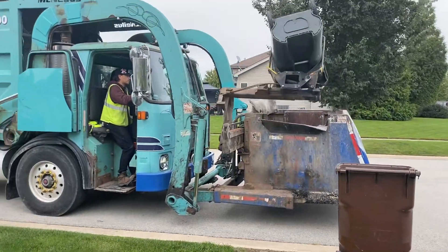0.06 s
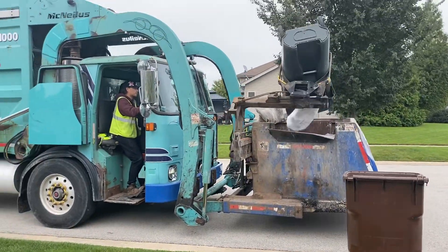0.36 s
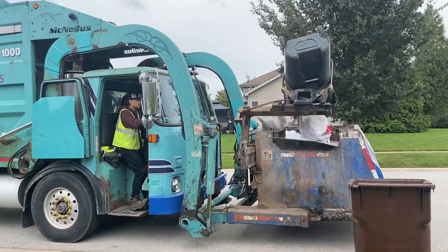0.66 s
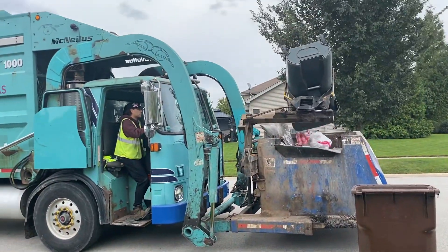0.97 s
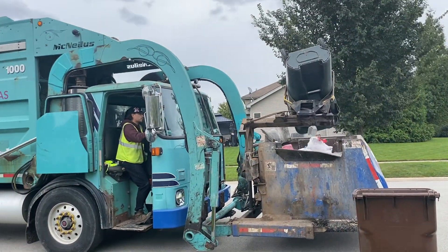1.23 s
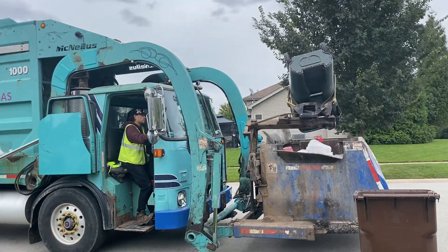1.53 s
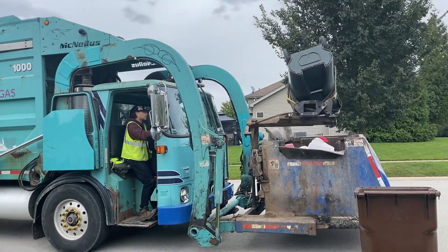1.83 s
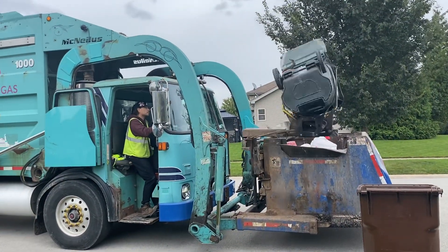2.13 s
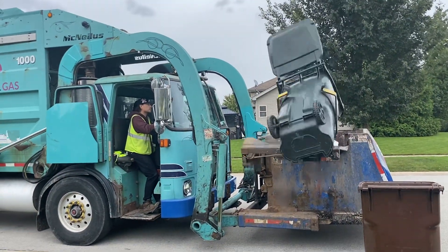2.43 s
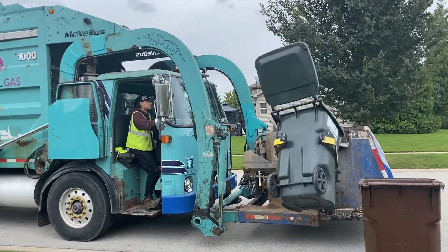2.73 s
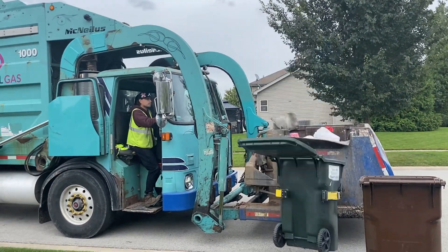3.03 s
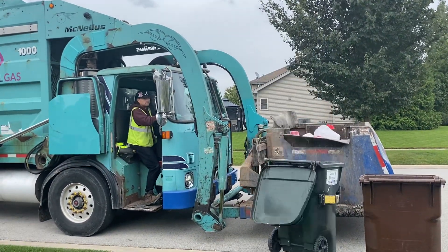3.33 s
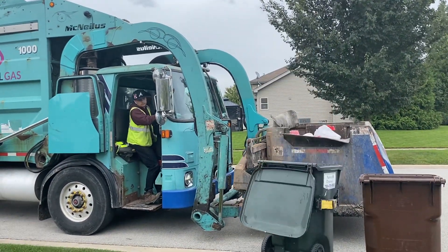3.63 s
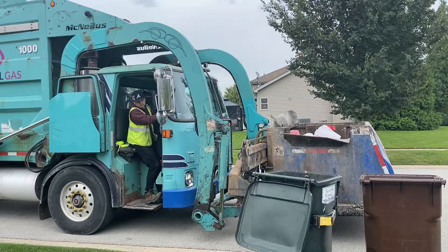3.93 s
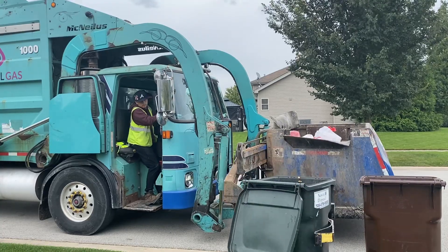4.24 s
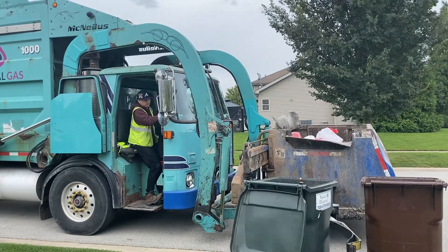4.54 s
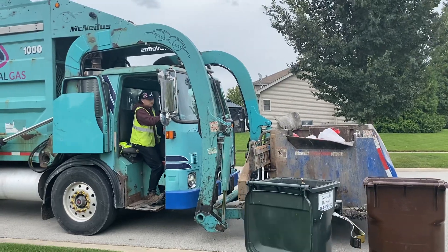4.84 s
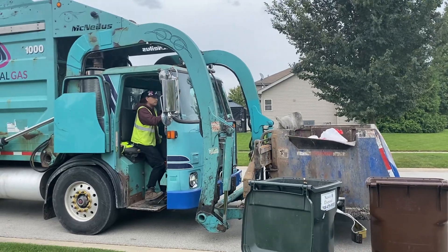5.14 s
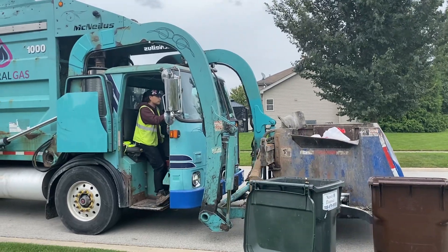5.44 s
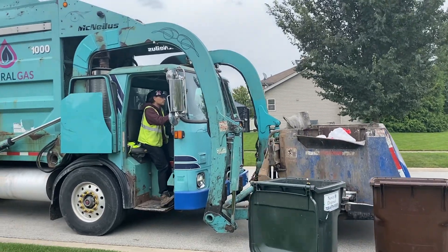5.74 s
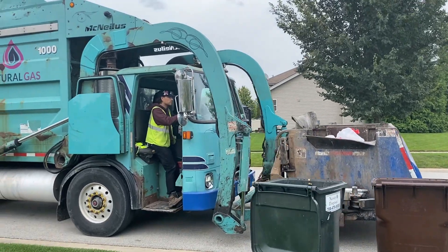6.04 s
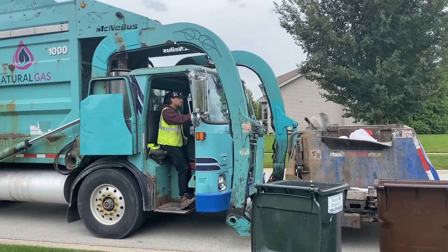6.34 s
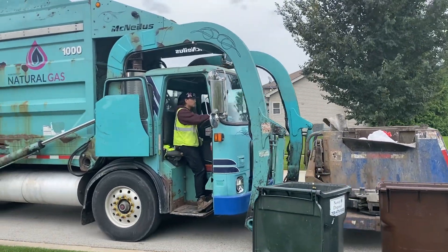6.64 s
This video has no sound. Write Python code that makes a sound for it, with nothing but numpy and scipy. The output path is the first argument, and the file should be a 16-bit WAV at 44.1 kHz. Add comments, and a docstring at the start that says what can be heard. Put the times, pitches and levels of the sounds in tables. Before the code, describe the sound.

A garbage truck idles a few metres away on an open street, with a low exhaust drone, faint pump whine and soft, rapid compressor chuffing. In the first two seconds its hydraulic arm shakes a plastic cart: a thump at 0.2 seconds, a brief rustle of bags at 0.6, and sharp steel clanks with hollow knocks at 0.8 and 1.6. Oil hisses softly as the arm moves. After a lull, the cart comes down from 2.9 to 3.4 seconds, knocking and rattling over booming hopper panels. Lighter taps lead to a heavier flurry of bangs, clanks and hollow drumming from 4 to 4.3, then another knock at 4.8. An air valve gives a short hiss at 5 seconds. Around 6 seconds the engine revs, with clanks, a thump and a very brief pivot squeal. Engine clatter and hydraulic hiss grow louder until the end, near 6.8 seconds.

```python
"""Open street, a few metres from an idling garbage truck. Its hydraulic arm shakes a plastic cart over the
hopper and swings it down: steel joints clank, the hollow cart drums and rattles, hopper panels boom,
bags rustle. An air valve vents; then the engine revs and a dry pivot squeals. Underneath, the exhaust
drones, the pump whines, oil hisses in the valves and the compressor chuffs once per crank turn."""
import sys
import numpy as np
from scipy import signal
from scipy.fft import rfft, irfft, next_fast_len
from scipy.io import wavfile
from scipy.ndimage import uniform_filter1d, minimum_filter1d, map_coordinates

SR = 44100
rng = np.random.default_rng(int(sys.argv[2]) if len(sys.argv) > 2 else 0)


def master_out(mix):
    """Clip the mix to full scale and print it as 16-bit PCM to the path in sys.argv[1]."""
    frames = np.transpose(np.atleast_2d(mix))
    ceiling = np.clip(frames, -1, 1)
    pcm = np.round(ceiling * 32767).astype(np.int16)
    wavfile.write(sys.argv[1], SR, pcm)


N = 299439

# steel on steel in arm and gripper: start_s, level_db, hardness_db, decay_scale_s, contact_hz, ring_share
ARM_CLANKS = [(0.177, -22, -5, 0.075, 1350, 0.2), (.212, -27, -6.5, 0.12, 2700, 0.4),
              (0.753, -31.5, -5, 0.037, 3340, 0.4), (.778, -9, -3, 0.049, 2940, 0.69),
              (1.199, -30, -6.5, 0.15, 1190, 0.17), (1.272, -31.5, -7, 0.059, 2880, 0.43),
              (1.6, -14, 3, 0.045, 1340, 0.6), (1.634, -18, -4, 0.081, 670, 0.03),
              (1.649, -22.5, -3, 0.036, 1900, 0.45), (2.943, -25, -13, 0.058, 1240, 0.26),
              (2.954, -20.5, -7.5, 0.037, 1690, 0.01), (2.99, -30.5, -22, 0.74, 1180, 0.23),
              (3.161, -20, -6, 0.06, 2460, 0.06), (3.976, -20, 6.5, 0.023, 1380, 0.3),
              (4.027, -20, 2, 0.03, 1070, 0.2), (4.046, -23, 3, 0.027, 3760, 0),
              (4.112, -13.5, 2.5, 0.057, 3350, 0.1), (4.163, -20.5, -5, 0.21, 2620, 0.22),
              (4.774, -15.5, -6, 0.0072, 1090, 0), (5.881, -28, -20, 0.01, 1060, 0),
              (6.011, -17.5, -4.5, 0.054, 1300, 0.09), (6.162, -16, -1, 0.081, 970, 0.08),
              (6.191, -25, 2.5, 0.12, 2240, 0.17)]
# steel arm: mode_hz, level_db, t60_s
ARM_MODES = [(233.5, -9, 0.42), (328, -6.5, 0.4), (409, -3.5, 0.41), (655, -12, 0.42), (685, 1.5, 0.093),
             (974, -9, 0.097), (1115, -2, 0.055), (1840, -12, 0.09), (2320, -2.5, 0.092), (2670, -3, 0.037),
             (2966, 1.5, 0.033), (3353, 1, 0.035)]
# linkage resonances: centre_hz, width_hz, gain
LINKAGE_PEAKS = [(2300, 10, 0.26), (3156, 77, 0.35), (4160, 59, 1), (6390, 110, 0.92), (7550, 140, 0.99),
                 (8000, 270, 1)]
# cart's weight jolts the truck: start_s, hopper_thump_db, cart_knock_db
LOAD_JOLTS = [(.18, -11.5, -24), (0.591, -32, -21.5), (.78, -22, -20.5), (1.203, -25, -25),
              (1.603, -20, -14.5), (2.02, -25, -28.5), (2.907, -12.5, -28.5), (2.992, -7.5, -19.5),
              (3.122, -8.5, -20), (3.166, -9, -23), (3.229, -13, -18), (3.32, -20, -23), (3.945, -6.5, -25),
              (3.98, -9, -13), (4.04, -9, -22.5), (4.105, -4.5, -13.5), (4.184, -5.5, -20),
              (4.494, -19, -22.5), (4.774, -13, -21), (6.16, -8, -23.5), (6.217, -8, -30)]
# lowest hopper modes: mode_hz, level_db, t60_s
HOPPER_MODES = [(59.7, -3.5, 0.27), (90, -1.5, 0.3), (125, -5, 0.089), (182.4, -6, 0.31)]
# cart walls and cavity: mode_hz, level_db, t60_s
CART_MODES = [(232, -14, 0.18), (310.5, -14, 0.22), (391, -9.5, 0.52), (441, -8.5, 0.19)]
# blows on cart walls and lid: start_s, note_db, pitch_hz, crack_db
CART_SLAPS = [(.595, -14, 385, -16.5), (.783, -9.5, 390, -28), (1.605, -11.5, 189.5, -22),
              (1.655, -11.5, 400, -34), (3.014, -16, 438, -34), (3.03, -11, 248.5, -39),
              (3.125, -8.5, 880, -22), (3.135, -16, 400, -21), (3.173, -11, 318, -35),
              (3.229, -14, 323, -17), (3.266, -22, 460, -19.5), (3.312, -12, 261, -29),
              (3.512, -21.5, 190.6, -39), (3.592, -21, 820, -31), (3.642, -19, 228.5, -45),
              (3.832, -15, 175.4, -32), (3.984, -2, 348.5, -26), (4.04, -11, 330, -30),
              (4.098, -20, 437, -21), (4.12, -6, 335, -28), (4.151, -13, 296, -21), (4.177, -7.5, 449, -24),
              (4.231, -9, 304, -27), (4.781, -12, 424, -17.5), (6.315, -18, 183, -47)]
# modes of one wall: pitch_ratio, level_db
WALL_MODES = [(0.999, -0.5), (1.271, -6.5), (2.18, -15), (2.74, -13)]
# hopper panels: freq_hz, density_db
BOOM_SPECTRUM = [(20, -28), (42, -39), (58, -3), (100, 4.5), (135, -4), (220, -13), (600, -66)]
# hollow plastic: freq_hz, density_db
RATTLE_SPECTRUM = [(76, -32), (130, -11), (291, 0), (522, -19), (796, -8.5), (1320, -17), (2720, -25),
                   (5290, -37.5), (7150, -32), (8920, -50), (16000, -56)]
# spells of cart chatter: start_s, end_s, level_db, pitch_hz
DRUM_SPELLS = [(3.18, 3.357, -21, 270), (4.08, 4.235, -11.5, 103), (4.777, 4.813, -12.5, 126),
               (4.785, 4.852, -23, 408), (6.161, 6.184, -10, 207)]
# drumming walls: pitch_ratio, density_db
DRUM_SPECTRUM = [(.35, -46), (.75, 6.5), (1.25, 0), (2.1, -12), (4.5, -25.5), (12, -64)]
# pivot slip: time_s, pitch_hz, lowest_mode_db, upper_modes_db
PIVOT_SLIP = [(6.125, 1010, -42, -50), (6.131, 990, -16, -36), (6.139, 980, -10.5, -26),
              (6.148, 965, -21, -18), (6.157, 960, -17, -22), (6.172, 945, -17, -28), (6.19, 935, -36, -50)]
# upper pivot modes: pitch_ratio, level_db
PIVOT_MODES = [(1.95, -9), (2.27, -5), (2.95, 0), (4, -7), (4.9, -10), (6.85, -6)]
# air jet: freq_hz, density_db
NOZZLE_SPECTRUM = [(1060, -35), (1800, -9), (4250, -6), (5100, -10), (6960, -11.5), (8360, -7.5),
                   (9160, -28), (9680, -12), (11900, -17), (13300, -14), (16000, -16)]
# air valve ports: centre_hz, width_hz, gain
PORT_PEAKS = [(4300, 170, 0.6), (6070, 300, 1.4), (7000, 180, 0.87)]
# arm strokes: open_s, close_s, oil_hiss_db, load_sway_db
ARM_STROKES = [(0.196, 0.417, -50.5, -22), (0.526, 0.647, -36, -26), (0.794, 0.994, -43, -25.5),
               (1.28, 2.067, -60, -26.5), (2.887, 2.95, -35.5, -23.5), (3.27, 4.46, -56, -21),
               (4.367, 5.238, -45, -22), (5.39, 5.957, -47, -25), (5.896, 6.8, -37.5, -25)]
# oil and friction hiss: freq_hz, density_db
HISS_SPECTRUM = [(400, -23), (1500, 3), (3000, 10.5), (5000, 1.5), (7000, 6.5), (10000, -0.5), (16000, 2)]
# gear pump whine: crank_order, level_db
PUMP_ORDERS = [(20, -50), (30, -50), (40, -56), (125.3, -57)]
# crankshaft: time_s, speed_hz
CRANK_SPEED = [(0, 13.4), (.3, 13.3), (.5, 12.75), (1, 13), (2.2, 13.4), (3, 13.45), (4.1, 13.55),
               (4.55, 12.9), (5.3, 13.4), (5.95, 13.55), (6.2, 20), (6.37, 18.7), (6.79, 22.6)]
# engine effort: time_s, clatter_db, exhaust_db
ENGINE_EFFORT = [(0, 4, 0.7), (2.6, 2, -1), (5.85, 2.5, -1.5), (6.1, 7, -5), (6.22, 2, 9.5),
                 (6.38, 7.5, -2), (6.55, 14, 3), (6.79, 12, 6)]
# exhaust note: crank_order, level_db
EXHAUST_ORDERS = [(3, -22.5), (4, -36), (5, -34), (6, -24), (10, -38), (13, -41), (16, -43)]
# exhaust pipe: freq_hz, gain_db
PIPE_RESPONSE = [(25, -30), (40, -12), (58, 1), (80, 0), (125, -13), (190, 0)]
# engine block and fan: freq_hz, density_db
BLOCK_SPECTRUM = [(20, -24), (45, 12.5), (100, 7), (170, -5), (380, -5.5), (480, -15), (720, -10.5),
                  (1400, -19.5), (2500, -24), (4500, -30), (7300, -30.5), (10000, -37), (16000, -42)]
# compressor puff: freq_hz, density_db
CHUFF_SPECTRUM = [(300, 4.5), (1400, -6.5), (1720, -8), (2000, -7.5), (2300, -3.5), (3300, -10),
                  (4500, -19), (16000, -34.5)]
# bags and paper: freq_hz, density_db
RUSTLE_SPECTRUM = [(700, -20), (2500, 0), (7000, -2), (12000, -16)]
# street reverberation: freq_hz, t60_s
STREET_DECAY = [(60, 0.22), (400, 0.92), (2000, 0.036), (12000, 0.17)]
# left-right likeness at the microphone pair: freq_hz, correlation
STEREO_CORRELATION = [(100, .99), (330, .95), (600, .76), (3500, .82), (5400, .6), (6600, .92), (7400, .92),
                      (8500, -.96), (9450, -.99), (10600, .92), (11600, .92), (12600, -.98), (13600, -.98),
                      (14700, .95)]
# stereo balance: freq_hz, left_over_right_db
STEREO_BALANCE = [(200, 0), (550, -1.8), (1000, .5), (2000, 2.2), (5000, 2.2), (6700, 0)]


def clanks():
    """Square blows ring the steel arm, glancing ones rattle; harder contacts tick and crack more."""
    track, t = np.zeros((2, N)), np.arange(SR // 2) / SR
    for start_s, level_db, hardness_db, decay_s, contact_hz, ring_share in ARM_CLANKS:
        contact = burst(t, .85 * contact_hz, 1.17 * contact_hz, 1.2 * decay_s)
        rattle = burst(t, 620, 1950, 2.1 * decay_s) + amp(1.5) * contact
        ringing = ring(t, ARM_MODES, scatter_db=3.5)
        clang = np.sqrt(1 - ring_share) * amp(-2) * rattle + np.sqrt(ring_share) * amp(-1) * ringing
        crack = burst(t, 8800, 15000, t60_s=.015)
        tick = burst(t, 2120, 6800, 1.44 * decay_s) + amp(-7.5) * crack
        add(track, start_s, amp(level_db) * (clang + amp(hardness_db - 3.5) * tick))
    return track


def jolts(thump_rise_s=.017):
    """Each jolt of the load thumps the hopper and knocks the hollow cart."""
    track, t = np.zeros((2, N)), np.arange(SR // 2) / SR
    for start_s, thump_db, knock_db in LOAD_JOLTS:
        thump = ring(t, HOPPER_MODES, scatter_db=1.5) * (1 - np.exp(-t / thump_rise_s))
        knock = burst(t, 130, 402, t60_s=.25) + ring(t, CART_MODES, scatter_db=2.5)
        add(track, start_s, amp(knock_db) * knock + amp(thump_db) * thump)
    return track


def linkage(blows):
    """Bending waves in steel run faster at high pitch: blows sweep downward and ring the linkage."""
    lag_cycles = lambda hz: .007 * (2 * np.sqrt(1e3 * (hz + 150)) - hz / 4)
    swept = filtered(blows, lambda hz: np.exp(-2j * np.pi * lag_cycles(hz)))
    return resonant(swept, LINKAGE_PEAKS)


def cart_slaps(note_t60_cycles=39, note_rise_s=.0023, crack_t60_s=.04):
    """Struck plastic cracks and sounds a short hollow note; pitch depends on where the wall is hit."""
    track, t = np.zeros((2, N)), np.arange(SR // 2) / SR
    for start_s, note_db, pitch_hz, crack_db in CART_SLAPS:
        modes = [(k * pitch_hz, db, note_t60_cycles / (k * pitch_hz)) for k, db in WALL_MODES]
        note = ring(t, modes, scatter_db=2) * (1 - np.exp(-t / note_rise_s))
        crack = burst(t, 600, 2200, crack_t60_s) + amp(-6) * burst(t, 2000, 7500, crack_t60_s)
        add(track, start_s, amp(note_db) * note + amp(crack_db) * crack)
    return track


def shaking():
    """Jolts and load sway make hopper panels boom and loose parts patter on the cart, brighter if hard."""
    times_s, thump_db, knock_db = np.transpose(LOAD_JOLTS)
    sway_power = sum((amp(db) * gate(open_s, close_s, rise_s=.008, fall_s=.28)) ** 2
                     for open_s, close_s, _, db in ARM_STROKES)
    boom_power = aftershake_power(times_s, thump_db - 5.5, rise_s=.0094, t60_s=.87)
    rattle_power = aftershake_power(times_s, knock_db - 1.5, rise_s=.0032, t60_s=.56)
    boom = np.sqrt(sway_power + boom_power) * noise(BOOM_SPECTRUM)
    rattle_level = np.sqrt(sway_power * amp(-12) ** 2 + rattle_power)
    contacts = amp(3.5 * wobble(130))
    rattle = rattle_level * noise(RATTLE_SPECTRUM, contacts)
    dull = filtered(rattle, lambda hz: 1 / (1 + (hz / 900) ** 2))
    brightness = np.clip(np.sqrt(rattle_level / amp(-27.5)), 0, 1)
    return boom + dull + brightness * (rattle - dull)


def cart_drumming():
    """The cart chatters against gripper and ground: quick slaps merge into a hollow rumble."""
    track = np.zeros((2, N))
    chatter = amp(3 * wobble(110))
    for start_s, end_s, level_db, pitch_hz in DRUM_SPELLS:
        walls = noise([(k * pitch_hz, db) for k, db in DRUM_SPECTRUM], chatter)
        track += amp(level_db) * gate(start_s, end_s, rise_s=.0042, fall_s=.016) * walls
    return track


def pivot_squeal():
    """A dry pivot sticks and slips: the lowest mode sings first, then the upper modes screech."""
    pitch_hz, tone_db, screech_db = curves(PIVOT_SLIP)
    mode = lambda k: np.sin(2 * np.pi * np.cumsum(k * pitch_hz * (1 + .025 * wobble(900))) / SR)
    tone = amp(tone_db) * unit(amp(2.5 * wobble(300)) * mode(1))
    screech = unit(sum(amp(db + 3 * wobble(300)) * mode(k) for k, db in PIVOT_MODES))
    t = np.arange(N) / SR
    slipping = (t > PIVOT_SLIP[0][0]) & (t < PIVOT_SLIP[-1][0])
    return slipping * (tone + amp(screech_db) * (screech + amp(-.5) * noise(HISS_SPECTRUM)))


def air_valve(start_s=5.03, rise_s=.0082):
    """Compressed air spits, then bleeds away, whistling in the valve's ports."""
    spit = amp(-26) * gate(start_s, start_s + .043, rise_s, fall_s=.021)
    bleed = amp(-32.5) * gate(start_s, start_s + .15, rise_s, fall_s=.12)
    return np.hypot(spit, bleed) * unit(resonant(noise(NOZZLE_SPECTRUM), PORT_PEAKS))


def hydraulics(crank_hz, turns, reference_hz=20.8, speed_exponent=2.14):
    """The engine-driven pump whines; oil hisses through the valves on each stroke, louder with speed."""
    whine = sum(amp(db + 3 * wobble(8)) * np.sin(2 * np.pi * k * turns + .7 * wobble(14))
                for k, db in PUMP_ORDERS)
    flow_power = sum((amp(db) * gate(open_s, close_s, rise_s=.014, fall_s=.28)) ** 2
                     for open_s, close_s, db, _ in ARM_STROKES)
    hiss_level = np.sqrt(flow_power) * (crank_hz / reference_hz) ** speed_exponent
    return np.sqrt(2) * whine + hiss_level * amp(.76 * wobble(25)) * noise(HISS_SPECTRUM)


def engine(crank_hz, turns):
    """Six cylinders fire three times a turn: the exhaust pipe drones, the block rumbles and clatters."""
    clatter_db, exhaust_db = curves(ENGINE_EFFORT)
    exhaust = np.zeros(N)
    for order, db in EXHAUST_ORDERS:
        level_db = db + along(PIPE_RESPONSE, order * crank_hz) + exhaust_db + 1.1 * wobble(13)
        exhaust += amp(level_db) * np.sqrt(2) * np.sin(2 * np.pi * order * turns + .2 * wobble(20))
    firing = 1 + .044 * np.cos(2 * np.pi * 3 * turns)
    block = amp(-30.5) * noise(BLOCK_SPECTRUM, firing)
    rumble = filtered(block, lambda hz: 1 / (1 + (hz / 170) ** 4))
    return exhaust + amp(2) * rumble + amp(clatter_db) * (block - rumble)


def compressor(turns, plate_hz=1700, plate_sustain=.14):
    """One puff of air per crank turn; the valve plate rings with it and faintly in between."""
    stroke_turns = (turns - .667) % 1
    puff = (1 - np.exp(-stroke_turns / .02)) * np.exp(-stroke_turns / .18)
    plate_rad = 2 * np.pi * plate_hz * np.arange(N) / SR + 1.6 * wobble(150)
    plate = unit((puff + plate_sustain) * np.sin(plate_rad))
    return amp(-40) * (noise(CHUFF_SPECTRUM, puff) + amp(-5.5) * plate)


def rubbish():
    """Bags and paper slide into the hopper, crinkling in clumps of tiny snaps."""
    snaps = amp(7 * wobble(700))
    return amp(-38) * gate(.6, .64, rise_s=.008, fall_s=.15) * noise(RUSTLE_SPECTRUM, snaps)


def street(x, rise_s=.0031):
    """Reverberation off truck body and house fronts; the low mids last longest."""
    hz, t, spectra = signal.stft(rng.standard_normal((2, SR // 2)), SR, nperseg=256)
    decay = amp(-60 * t / along(STREET_DECAY, hz)[:, None])
    tail = signal.istft(spectra * decay, SR, nperseg=256)[1]
    tail *= 1 - np.exp(-np.arange(tail.shape[1]) / SR / rise_s)
    return signal.fftconvolve(x, tail / np.linalg.norm(tail[0]), axes=1)[:, :N]


def amp(db):
    """Decibels to gain."""
    return 10 ** (np.asarray(db) / 20)


def unit(x):
    """Scale to rms 1."""
    return x / np.sqrt(np.mean(x ** 2) + 1e-20)


def along(points, hz):
    """(freq_hz, value) points read on a log axis."""
    freq_hz, values = np.transpose(points)
    return np.interp(np.log(hz + 1), np.log(freq_hz + 1), values)


def curves(rows):
    """One value per sample for each column after time_s."""
    time_s, *columns = np.transpose(rows)
    return [np.interp(np.arange(N) / SR, time_s, column) for column in columns]


def wobble(rate_hz):
    """Smooth random curve, rate_hz knots a second."""
    knots = rng.standard_normal(int(N * rate_hz / SR) + 4)
    return map_coordinates(knots, [np.arange(N) * rate_hz / SR])


def gate(start_s, end_s, rise_s, fall_s):
    """Rises from start_s, holds, dies away after end_s."""
    t = np.arange(N) / SR
    attack = 1 - np.exp(-np.maximum(t - start_s, 0) / rise_s)
    return attack * np.exp(-np.maximum(t - end_s, 0) / fall_s)


def aftershake_power(times_s, level_db, rise_s, t60_s):
    """Summed power of the shaking after blows; each share builds up and dies away."""
    t = np.arange(2 * SR) / SR
    kicks = np.bincount(np.round(times_s * SR).astype(int), amp(level_db) ** 2, N)
    envelope = (1 - np.exp(-t / rise_s)) * amp(-60 * t / t60_s)
    return np.abs(signal.fftconvolve(kicks, envelope ** 2)[:N])


def filtered(x, response):
    """x through a complex frequency response."""
    n = x.shape[-1]
    padded = next_fast_len(n + 8192)
    return irfft(rfft(x, padded) * response(np.fft.rfftfreq(padded, 1 / SR)), padded)[..., :n]


def resonant(x, peaks):
    """x plus its ringing in (centre_hz, width_hz, gain) resonances."""
    peak = lambda f, hz, width_hz: 1j * f * width_hz / (hz * hz - f * f + 1j * f * width_hz)
    return filtered(x, lambda f: 1 + sum(gain * peak(f, hz, width_hz) for hz, width_hz, gain in peaks))


def noise(spectrum, drive=1):
    """Two independent noises, modulated by drive, coloured, scaled to rms 1."""
    return unit(filtered(drive * rng.standard_normal((2, N)), lambda hz: amp(along(spectrum, hz))))


def burst(t, lo_hz, hi_hz, t60_s):
    """Dense cluster of modes struck at t = 0: a decaying noise band."""
    band = signal.butter(2, [lo_hz, hi_hz], "band", fs=SR, output="sos")
    white = rng.standard_normal((2, len(t)))
    return signal.sosfilt(band, white * amp(-60 * t / t60_s)) * np.sqrt(SR / 2 / (hi_hz - lo_hz))


def ring(t, modes, scatter_db):
    """Modes struck at t = 0, each with random strength and phase."""
    hz, db, t60_s = np.transpose(modes)[:, :, None]
    strength = amp(db + scatter_db * rng.standard_normal(hz.shape) - 60 * t / t60_s)
    return np.sum(strength * np.sin(2 * np.pi * (hz * t + rng.random((2, len(modes), 1)))), axis=1)


def add(track, start_s, sound):
    """Mix a sound in at start_s."""
    part = track[:, round(start_s * SR):][:, :sound.shape[-1]]
    part += sound[..., :part.shape[-1]]


def scene():
    """All sources as mid and side, then left and right; the treble's phase alternates band by band."""
    crank_hz, = curves(CRANK_SPEED)
    turns = np.cumsum(crank_hz) / SR
    knocks = linkage(clanks() + jolts()) + cart_slaps()
    lift = knocks + shaking() + cart_drumming() + pivot_squeal()
    truck = air_valve() + hydraulics(crank_hz, turns) + engine(crank_hz, turns) + compressor(turns)
    mix = lift + truck + rubbish() + amp(-13.5) * street(knocks)
    angle = lambda hz: np.arccos(np.clip(along(STEREO_CORRELATION, hz), -1, 1)) / 2
    mid, side = filtered(mix, lambda hz: np.array([np.cos(angle(hz)), 1j * np.sin(angle(hz))]))
    balance = lambda hz: amp(np.outer([.5, -.5], along(STEREO_BALANCE, hz)))
    return filtered(np.array([mid + side, mid - side]), balance)


def record(dry, low_cut_hz=31, ceiling=.96, top_hz=15900):
    """Microphone bass roll-off, peak limiter, band limit."""
    heard = filtered(dry, lambda hz: 1 - 1 / (1 + (hz / low_cut_hz) ** 4))
    needed_gain = np.minimum(1, ceiling / (np.abs(heard).max(axis=0) + 1e-9))
    gain = uniform_filter1d(minimum_filter1d(needed_gain, size=160), size=140)
    return filtered(heard * gain, lambda hz: hz < top_hz)


dry = scene()
out = record(dry)
master_out(out)
```